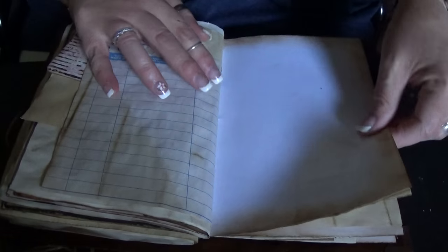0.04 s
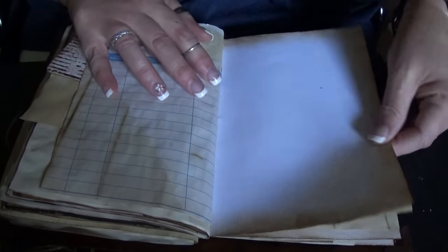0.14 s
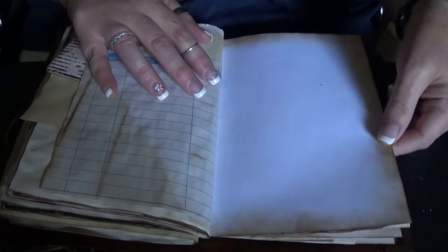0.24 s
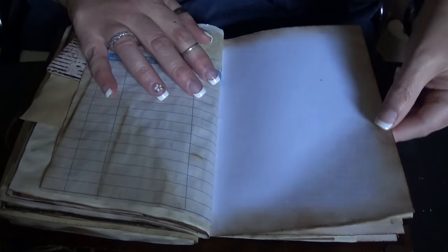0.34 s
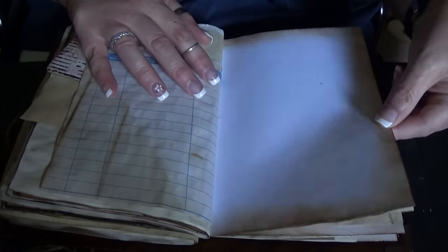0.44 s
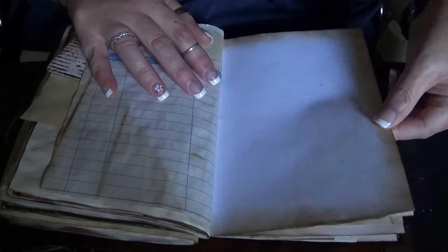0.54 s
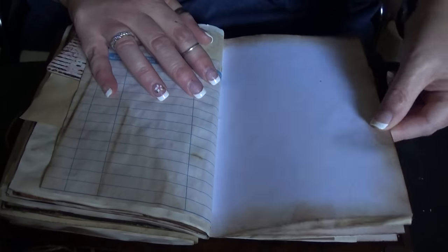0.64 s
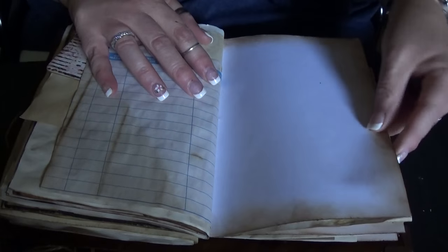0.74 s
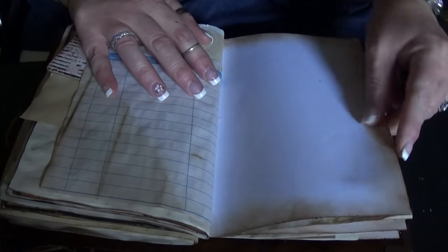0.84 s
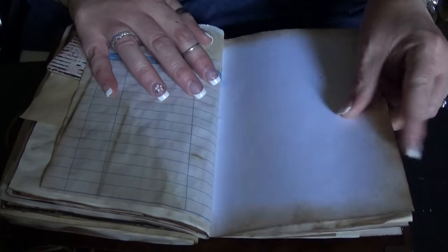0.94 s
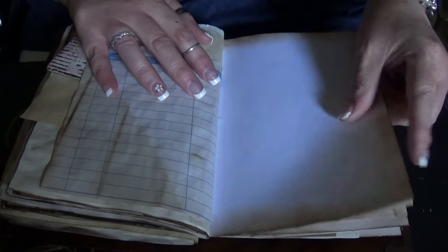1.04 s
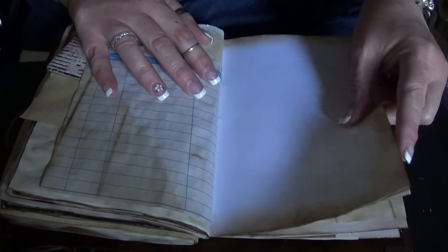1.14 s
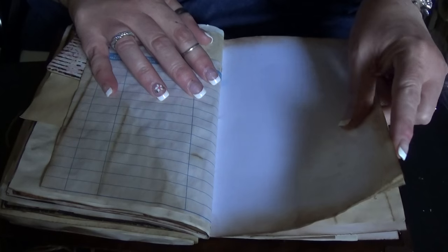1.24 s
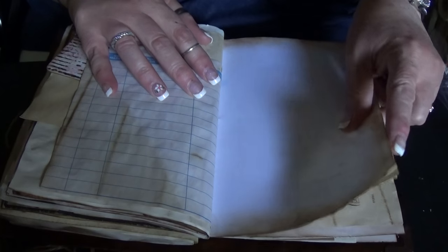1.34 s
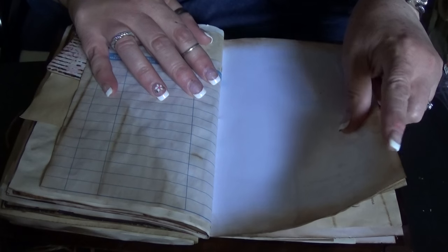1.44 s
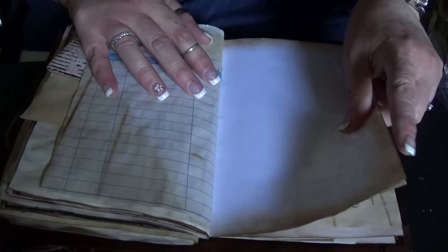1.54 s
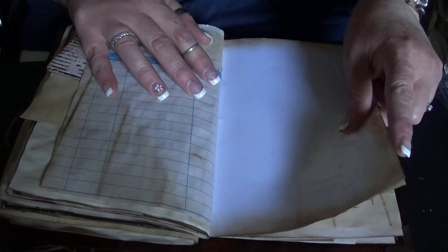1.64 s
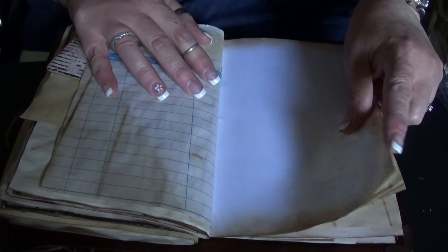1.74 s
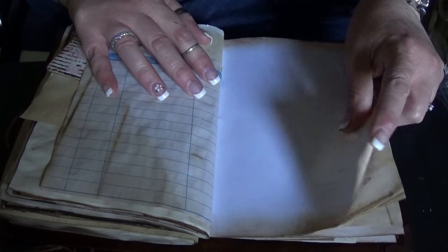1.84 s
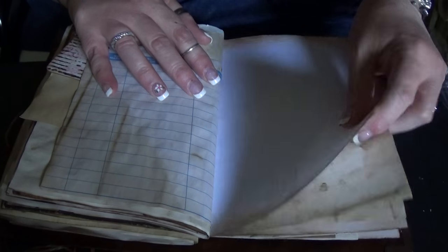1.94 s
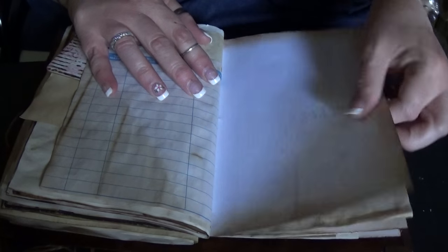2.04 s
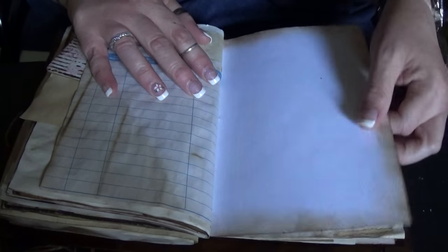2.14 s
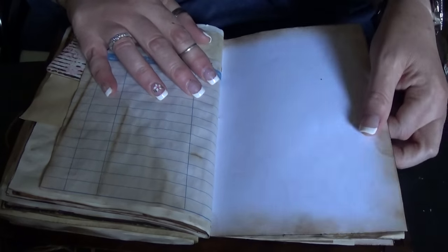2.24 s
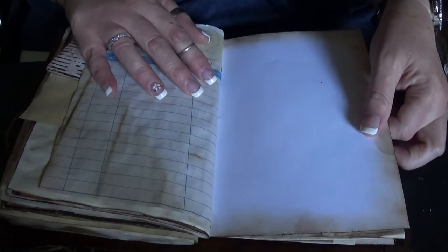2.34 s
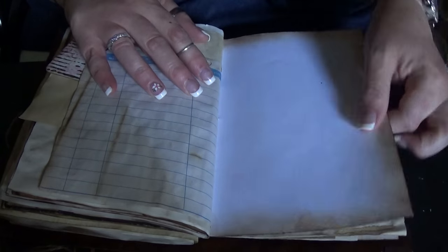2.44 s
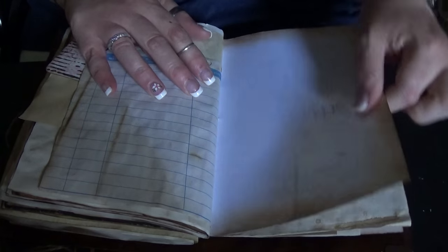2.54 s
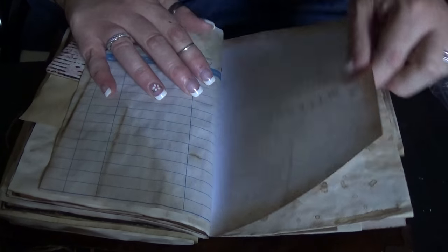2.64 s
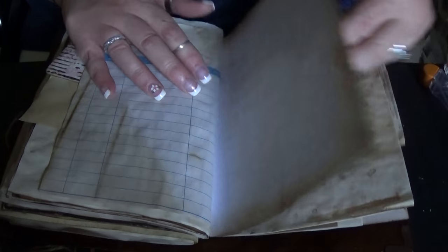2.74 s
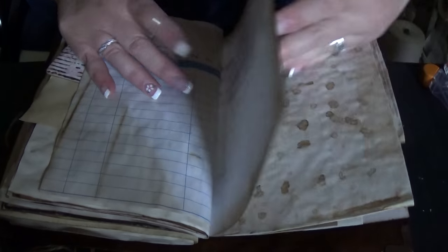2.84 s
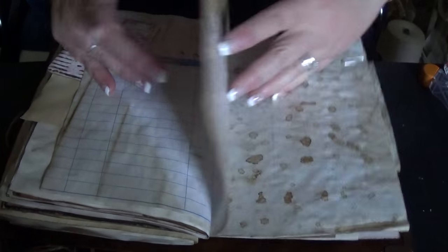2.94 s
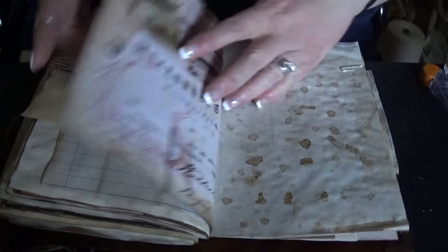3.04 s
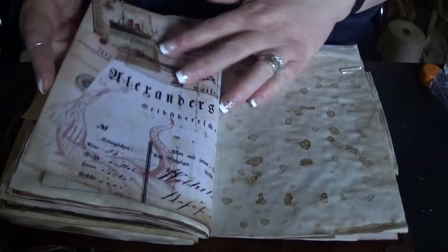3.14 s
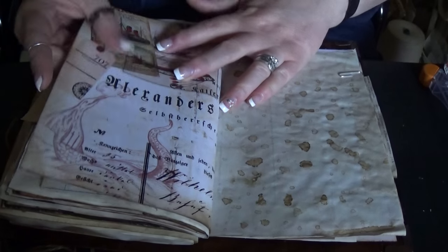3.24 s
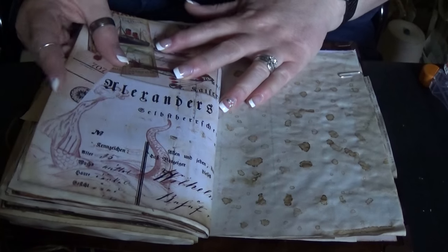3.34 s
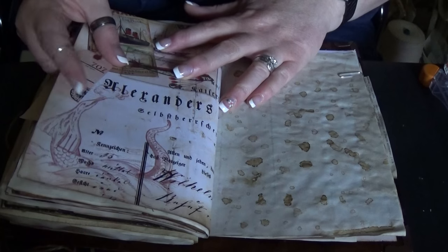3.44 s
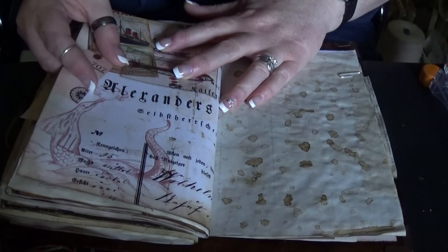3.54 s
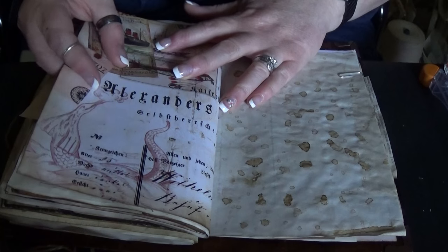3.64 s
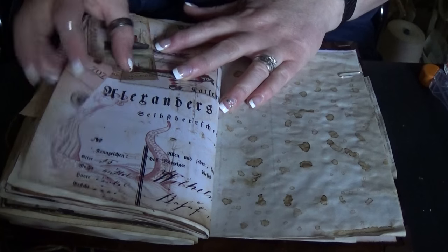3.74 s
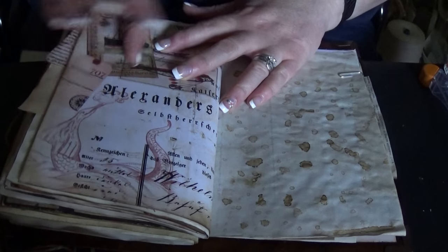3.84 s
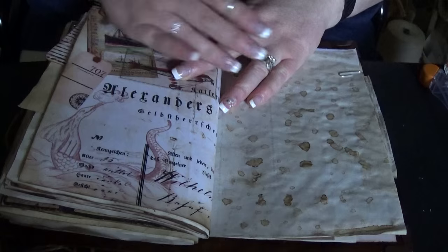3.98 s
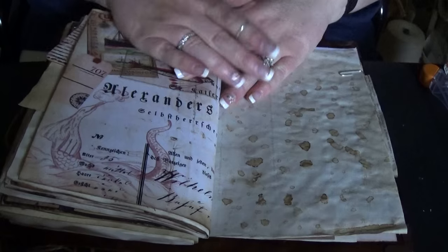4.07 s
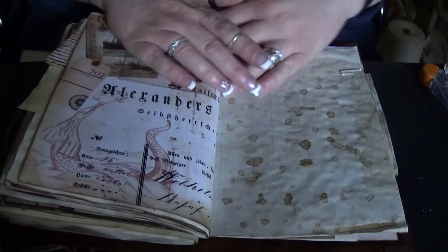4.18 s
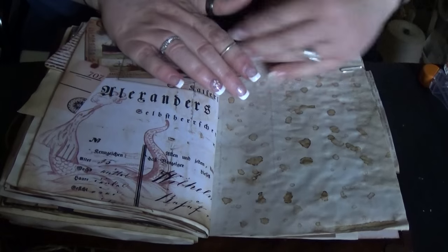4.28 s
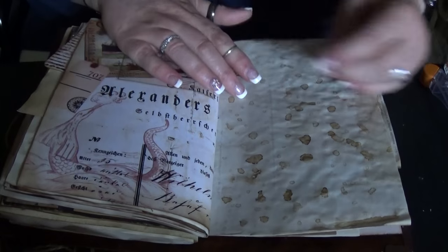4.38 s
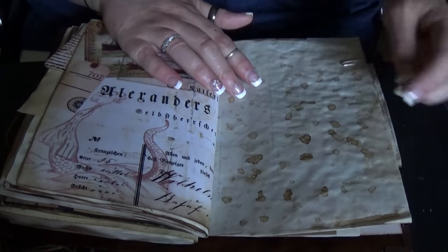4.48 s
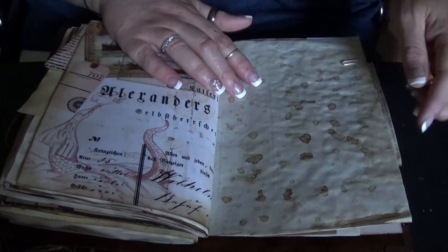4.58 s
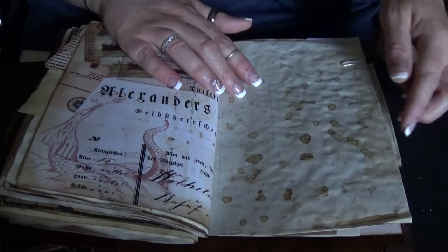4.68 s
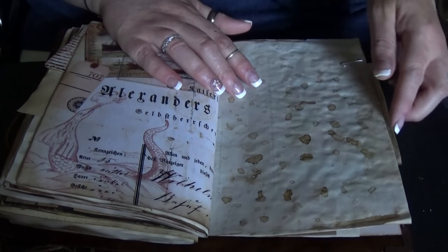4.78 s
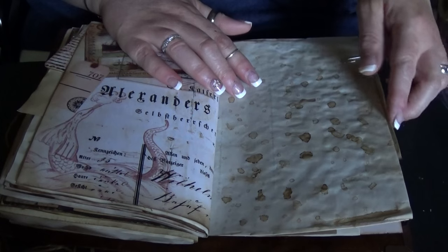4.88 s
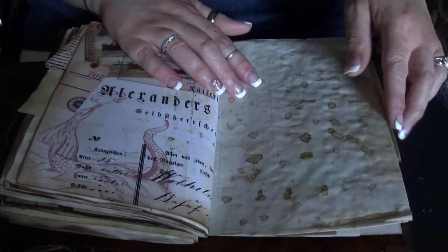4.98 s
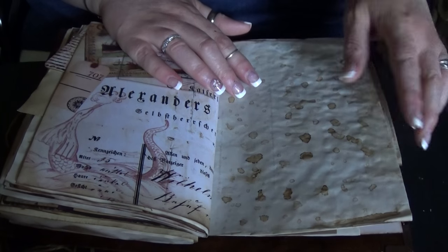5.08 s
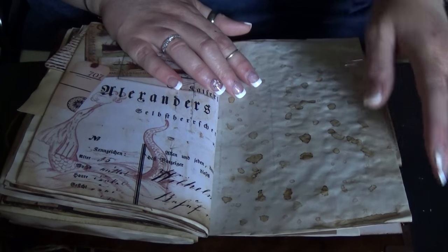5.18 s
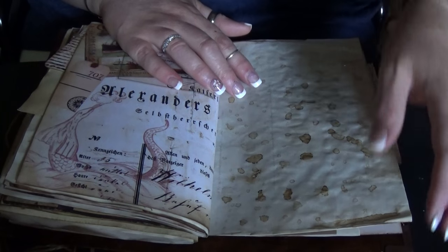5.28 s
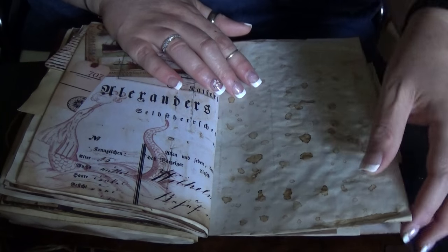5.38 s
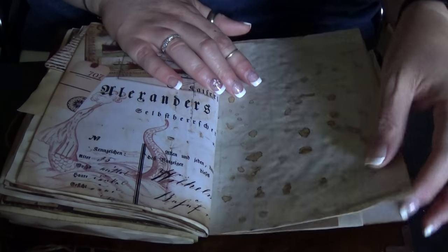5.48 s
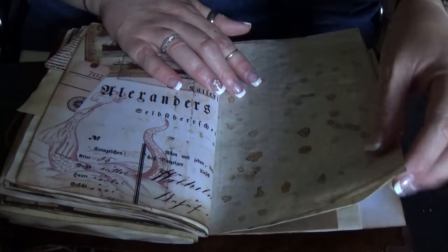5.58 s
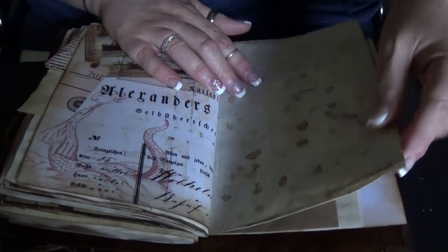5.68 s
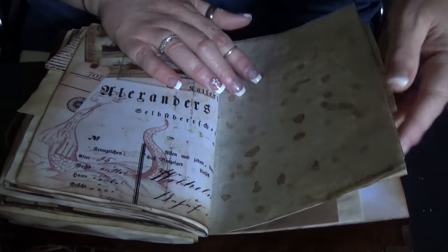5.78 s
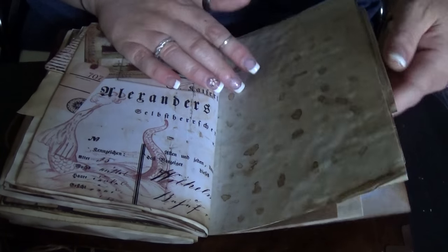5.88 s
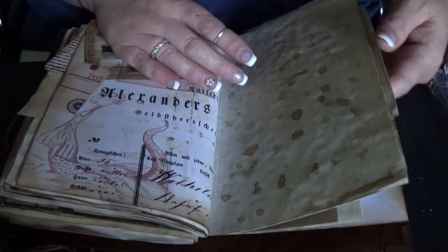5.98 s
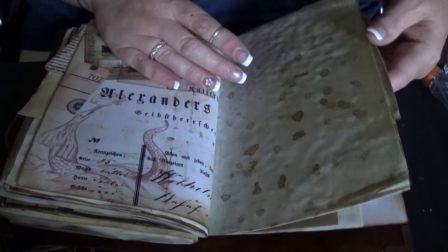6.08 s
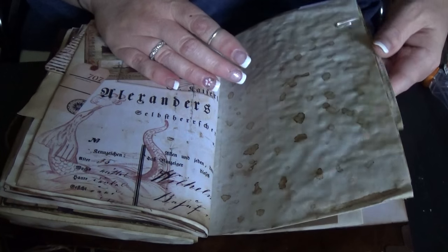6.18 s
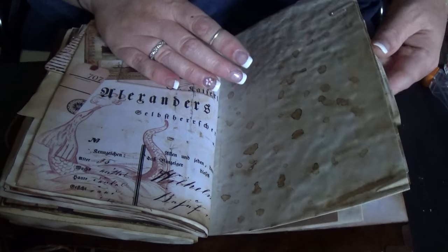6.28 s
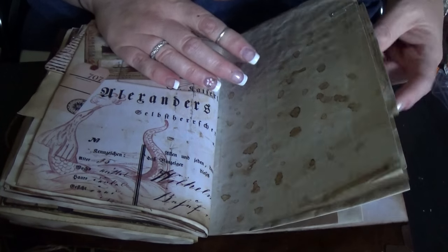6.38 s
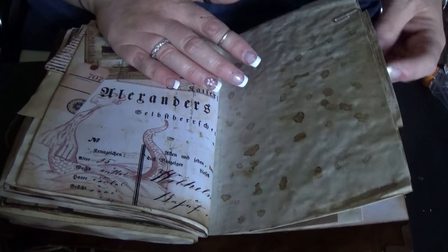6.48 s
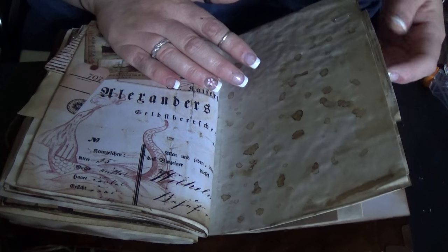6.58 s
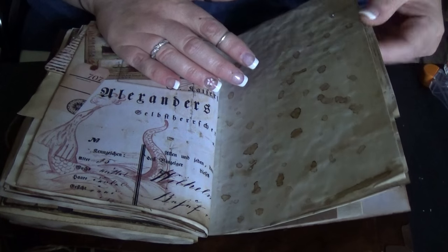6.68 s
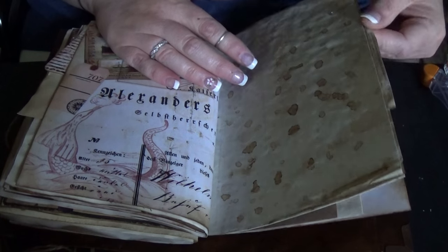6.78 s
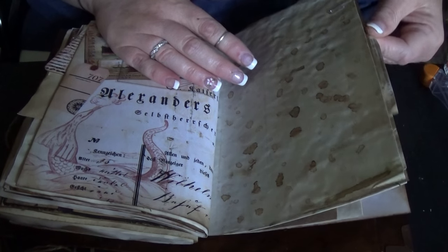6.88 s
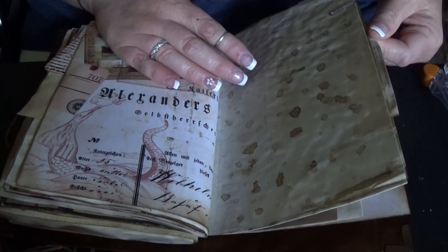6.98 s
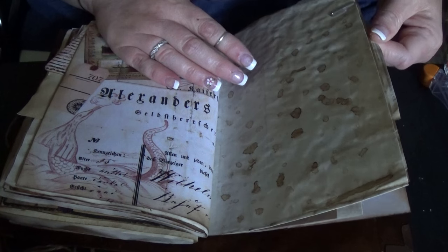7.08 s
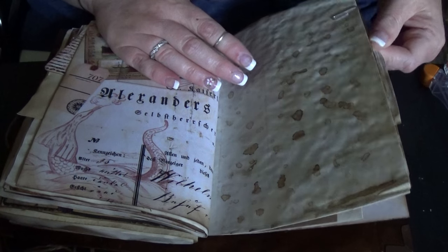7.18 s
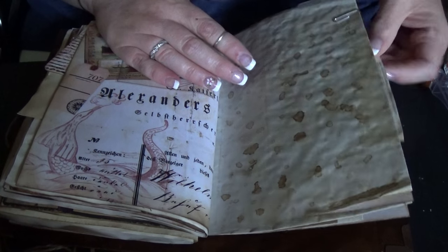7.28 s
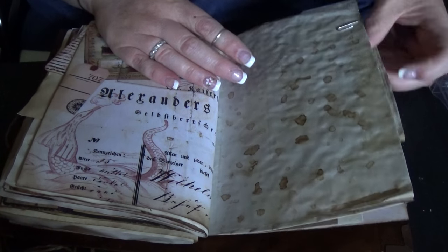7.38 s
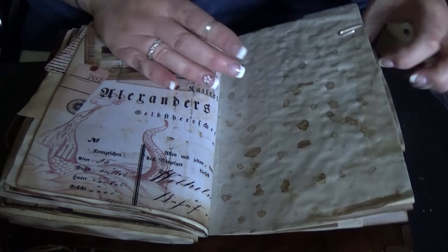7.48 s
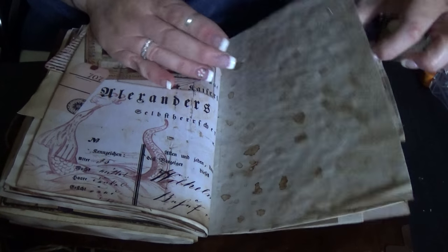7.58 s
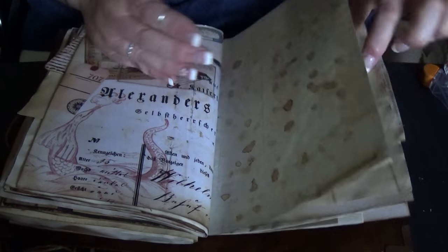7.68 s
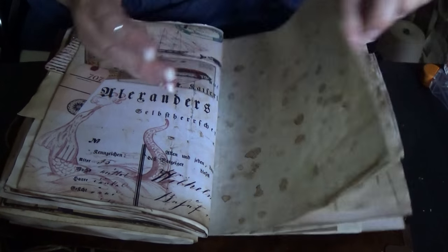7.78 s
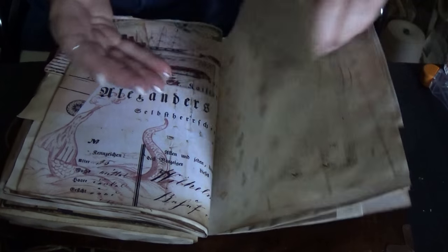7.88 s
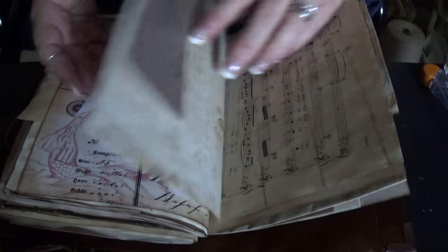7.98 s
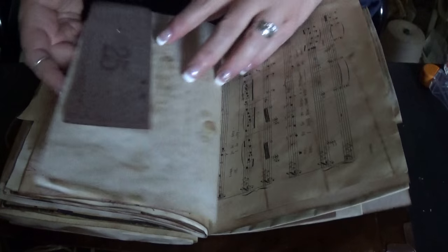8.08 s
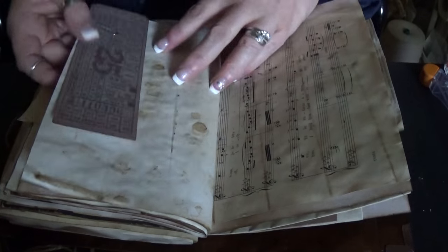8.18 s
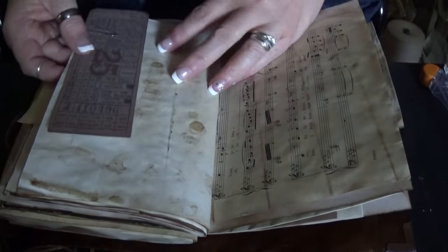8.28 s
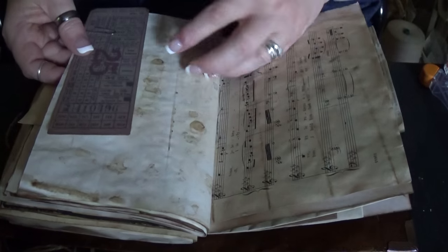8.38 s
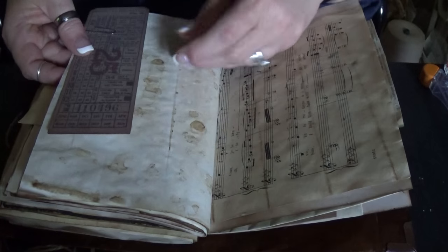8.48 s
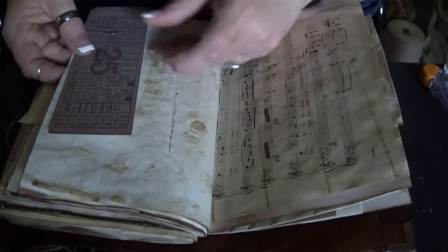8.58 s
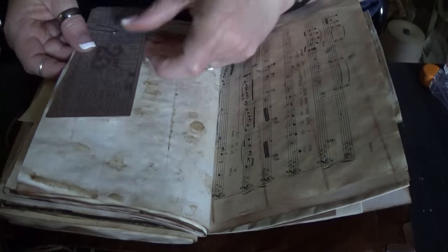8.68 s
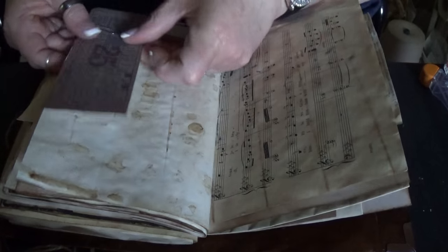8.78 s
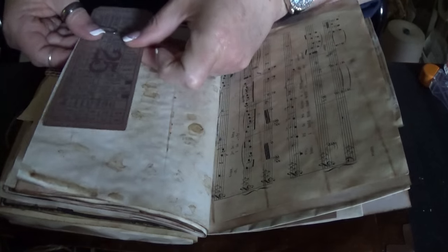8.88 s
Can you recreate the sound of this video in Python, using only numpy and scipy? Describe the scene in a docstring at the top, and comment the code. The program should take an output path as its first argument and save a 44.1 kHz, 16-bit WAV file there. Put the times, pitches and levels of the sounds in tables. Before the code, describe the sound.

Stiff paper pages of a thick journal are handled and turned, with close rustling, sliding and small crisp snaps.

```python
"""Stiff, stained pages of a thick handmade journal, leafed through by two hands, close, in a small room.
Fingers and sheets slide with stick-slip friction; sheets buckle with small snaps and creases tick.
Two pages flop over; hands and falling pages press puffs of air out of the stack.
Underneath: room noise, a faint far drone and, in the first half, the ticking whine of a lens motor."""
import sys
import numpy as np
from scipy import signal
from scipy.fft import rfft, irfft, next_fast_len
from scipy.io import wavfile
from scipy.ndimage import uniform_filter1d

SR = 44100
rng = np.random.default_rng(int(sys.argv[2]) if len(sys.argv) > 2 else 0)


def store_pcm(level_fs):
    """Save levels as 16-bit WAV."""
    pcm = np.round(np.clip(level_fs, -1, 1) * 32767).astype(np.int16)
    wavfile.write(sys.argv[1], SR, np.atleast_2d(pcm).T)


N = 393372
TIME_S = np.arange(N) / SR
BURST_LEAD_S = 0.005
CONTROL_HOP = 64

# room noise: freq_hz, density_db
ROOM_NOISE_SPECTRUM = [(15, -30), (25, -11.5), (70, -7), (161, -6), (211, -5.5), (248, -4), (299, -9.5),
                       (333, -10), (486, -8.5), (557, -13.5), (857, -9), (1120, -13.5), (2090, -20),
                       (2390, -21.5), (15800, -34.5)]
# room noise, left against right: freq_hz, correlation
ROOM_NOISE_COHERENCE = [(60, 1), (130, 0.99), (300, 0.89), (1000, 0.52), (4000, 0.25), (12000, 0.99)]
# far tones: pitch_hz, peak_s, half_width_s, peak_db, rest_db
DRONE_TONES = [(95.2, 2.72, 1.1, -57.5, -71), (213.4, 1.34, 0.67, -60, -79.5)]
# room decay: freq_hz, t60_s
ROOM_DECAY = [(150, 0.29), (1000, 0.28), (4000, 0.4), (9000, 0.23), (16000, 0.12)]
# hands crossing the book, left minus right before port weighting: time_s, pan_db
HAND_PAN = [(0, -1.5), (2.65, -2), (3.2, 1.5), (3.75, 1.5), (5, -3), (7.3, -1.5), (8.15, 0.4), (8.9, 0.5)]
# two microphone ports: freq_hz, pan_weight, left_lead_rad
MIC_PORTS = [(100, .3, .02), (400, 0.65, 0.23), (1000, 1.1, 0.22), (2200, 0.33, 0.26), (3600, 0.91, .09),
             (5840, 1.6, 0.24), (8040, 1.4, 0.087), (10100, 0.36, 0), (13000, 0.15, 0.024)]
# air pressed from the stack: start_s, level_db, decay_s
PUFFS = [(0.23, -45.5, 0.042), (.675, -45.5, 0.031), (3.142, -44, 0.042), (3.719, -41.5, 0.012),
         (3.791, -44.5, 0.026), (4.172, -62, 0.019), (8.143, -73, 0.023), (8.661, -55, 0.11),
         (8.761, -59, 0.099)]
# puff: freq_hz, density_db
PUFF_SPECTRUM = [(40, -18), (110, 5), (180, 1.5), (300, -1), (480, 4.5), (620, 7.5), (1200, -31),
                 (3000, -50)]
# paper's scrape, fine hiss and dull flexing: freq_hz, density_db
SCRAPE_SPECTRUM = [(900, -15), (1800, -1), (2400, -0.5), (3000, 2.5), (4000, 0.5), (5200, -0.5), (6500, -1),
                   (7600, -1.5), (10000, -18)]
HISS_SPECTRUM = [(4000, -20), (6300, -10), (7300, -8.5), (8200, -3), (9200, 2), (10300, -0.5),
                 (11500, -6.5), (13000, -13), (15800, -21)]
FLEX_SPECTRUM = [(60, -25), (140, -9.5), (330, -14), (550, -4), (800, 2.5), (1300, -0.5), (1900, -2.5),
                 (2500, -1.5), (4000, -21.5)]
# highest hiss, finest when skin slides on skin: time_s, gain_db
SHEEN_CURVE = [(0, -0.5), (1.3, 0.5), (1.95, 2), (2.9, 4.5), (3.7, -4), (4.2, 4), (5.1, 3.5), (5.7, 0),
               (6.4, -4), (7.3, -1), (7.95, 3), (8.8, -1.5)]
# buckles, flicked edges, nail taps: start_s, crack_db, tick_rel_db, knock_rel_db, decay_s, pitch_hz
PAPER_SNAPS = [(.2242, -51.5, -11, 9.5, .0022, 700), (.2656, -60.5, -4, 15, .0011, 930),
               (.2961, -52, -1, 7.5, .003, 730), (0.432, -52.5, -1, -6, 0.0015, 980),
               (0.6771, -43.5, -2, 10, 0.0018, 1270), (.683, -39, -1, -9, 0.0054, 1140),
               (0.916, -40.5, -11, 1.5, 0.002, 2330), (0.9589, -36.5, -19, -0.5, 0.0071, 1190),
               (1.0987, -47.5, -17, -15, .0008, 5090), (1.127, -48.5, -19, 5.5, .0007, 820),
               (1.2898, -28.5, -1, -11, 0.0011, 3820), (1.9183, -40.5, 13, -1.5, 0.0068, 5500),
               (1.9716, -34.5, -3, -2, .0018, 5510), (2.0085, -35, 8, -16, 0.0015, 5890),
               (2.7777, -46.5, 2, -10, 0.002, 3200), (3.099, -42, -3, -15, .0015, 5590),
               (3.1357, -34.5, 1, 1.5, 0.0031, 4040), (3.1448, -41.5, -5, 6.5, 0.0086, 1210),
               (3.1493, -31.5, -4, -1.5, 0.0013, 2960), (3.7215, -46, 9, 8, 0.0026, 1250),
               (3.7833, -36.5, -7, -20, .0025, 4030), (3.8005, -43.5, 7, -10, .0011, 5300),
               (4.1734, -59, 5, 10, 0.0016, 1480), (4.796, -54, -19, -2, 0.0012, 3380),
               (4.84, -55, -12, -8, 0.001, 3000), (4.3882, -44, 5, -22, .0045, 4740),
               (4.88, -55, 6, -16, .00085, 3610), (4.9507, -51.5, -7, -9, .001, 1760),
               (5.067, -40.5, -2, -23, .0009, 2980), (5.4258, -54, 2, -4, 0.0032, 4010),
               (5.474, -63, 11, -8, .0006, 5000), (5.524, -55.5, -4, 10.5, 0.0011, 790),
               (5.5492, -37.5, -14, -5.5, 0.0018, 5300), (5.6175, -47, -2, -9, 0.00099, 3370),
               (5.735, -47, -17, 2, 0.0018, 2320), (5.8648, -62, 0, 12, .0018, 900),
               (6.1989, -41.5, -11, -6, 0.0027, 1050), (6.2281, -46, 4, 6.5, 0.0021, 756),
               (6.2632, -41.5, 8.5, -1, 0.0036, 4120), (6.3489, -29, -7, -26, 0.0014, 4230),
               (6.3632, -41, 12, -25, 0.0016, 4460), (6.3966, -27.5, 5.5, -5, 0.0017, 5000),
               (6.714, -42, -3, -6, 0.0037, 4580), (6.834, -52, 8, -5, 0.0093, 3980),
               (7.31, -39.5, -5, -14, 0.0034, 2370), (7.5714, -43.5, 3, -13, 0.00089, 2880),
               (7.6037, -42, 1, 1.5, 0.00075, 975), (7.7196, -41.5, -5, -12, 0.0063, 2740),
               (7.8014, -35.5, -17, -3, 0.0038, 3870), (7.8255, -38, -17, 7, 0.0073, 895),
               (7.8804, -30.5, -11, -4, 0.0026, 2720), (7.9031, -22, -8, -24, 0.0017, 3280),
               (7.9283, -35.5, 2, -0.5, 0.0017, 2230), (8.001, -38, -6, -6, .0022, 3700),
               (8.0105, -40, 6.5, -16, 0.00082, 4100), (8.0958, -31.5, -6, -7, 0.0035, 2380),
               (8.1076, -22.5, 0, -23, 0.00058, 2870), (8.3402, -46, -7, 2, 0.0019, 1700),
               (8.6148, -44.5, -8, 2, 0.0014, 1500), (8.6583, -35.5, -20, -0.5, 0.0014, 3080),
               (8.7112, -28, -8, -9.5, 0.0019, 3320), (8.907, -43, -16, -5, .0009, 3600)]
# finger or sheet slides: peak_s, rise_s, fall_s, scrape_db, hiss_rel_db, flex_rel_db, span_pitch_hz
SLIDE_STROKES = [ (.04, 0.19, 0.054, -41, -2, -7.5, 4200), (.16, 0.088, 0.1, -39, -1, -10, 4360),
                 (.25, 0.066, .05, -52, -3, 5.5, 3900), (.315, 0.085, 0.075, -47.5, -0.5, -21, 3770),
                 (.5, 0.34, 0.18, -61, -4.5, -2, 3300), (.685, 0.068, 0.026, -49.5, -2, 7.5, 3600),
                 (.75, 0.1, 0.065, -44.5, 4.5, -10, 5040), (.885, 0.039, 0.051, -40, 2.5, -10, 5440),
                 (.935, .05, 0.11, -43, 0.5, -11, 5200), (1.085, 0.031, 0.034, -52.5, -3, 5.5, 4600),
                 (1.235, 0.066, 0.089, -53.5, -4.5, -5, 4500), (1.31, 0.057, 0.11, -50, -3.5, -5.5, 4300),
                 (1.41, 0.031, 0.027, -39, 0, -12, 4230), (1.49, 0.058, 0.065, -54, -2, -6, 4100),
                 (1.555, 0.025, 0.016, -56.5, 7, -13, 4100), (1.86, .04, 0.09, -44.5, -8, -24, 4400),
                 (1.93, 0.09, 0.041, -40.5, -0.5, -12, 5030), (2.016, 0.16, 0.12, -37.5, 5.5, -12.5, 5100),
                 (2.209, .04, 0.057, -56.5, -4, 1.5, 5000), (2.43, 0.15, 0.091, -57.5, -2, -7, 3800),
                 (2.675, 0.14, 0.08, -42, -8.5, -14, 3950), (2.73, 0.12, 0.078, -53, 5, -6, 3800),
                 (2.819, 0.035, 0.013, -39.5, 0.5, -14, 3800), (2.89, 0.047, 0.31, -52.5, 13, -12, 4080),
                 (3.14, 0.19, .15, -43, 5.5, -11, 3480), (3.3, .1, 0.13, -52, 5, -9, 3450),
                 (3.54, 0.079, 0.097, -58.5, 7, -17, 3700), (3.76, .13, 0.057, -40.5, 5.5, -17, 4060),
                 (3.8, 0.037, 0.027, -48.5, -9, 4.5, 4000), (4.045, .018, 0.11, -62, 12.5, -8, 4000),
                 (4.23, 0.18, 0.21, -47.5, 10.5, -6, 3800), (4.41, 0.11, 0.034, -53.5, 12.5, -17, 4070),
                 (4.86, 0.11, 0.047, -56, -8, -3, 3600), (5.062, 0.021, 0.021, -40, -2, -23, 4150),
                 (5.55, 0.058, 0.054, -52, 4.5, -7, 4600), (5.7, 0.11, 0.11, -51.5, 5.5, -8.5, 4940),
                 (5.93, 0.17, 0.14, -53.5, 8, -4, 4420), (6.075, 0.11, 0.1, -46.5, 4, -28, 4600),
                 (6.29, 0.16, 0.16, -46, 3.5, -7, 3600), (6.378, 0.045, 0.044, -30, -3, -10, 3120),
                 (6.42, .03, 0.11, -52.5, 2.5, 0, 3000), (6.595, 0.066, 0.034, -55.5, 1, -21, 3730),
                 (6.73, 0.065, 0.12, -49.5, 3.5, -9, 3960), (7.295, 0.063, .06, -50.5, 3, -1, 3500),
                 (7.395, 0.085, 0.088, -43, 2.5, -11, 3900), (7.53, 0.072, 0.086, -53, -0.5, -7, 3600),
                 (7.68, 0.12, 0.05, -54, -0.5, -4, 3160), (7.772, 0.047, 0.051, -41.5, -3, -6, 3080),
                 (7.88, 0.096, 0.15, -46.5, 3.5, -0.5, 3450), (8.015, 0.12, 0.065, -43.5, 5.5, -8, 3530),
                 (8.124, 0.064, 0.1, -41.5, 3.5, -2.5, 3600), (8.24, 0.2, 0.26, -50.5, 9.5, -8.5, 3630),
                 (8.407, 0.043, 0.035, -41.5, 2, -6.5, 3870), (8.495, 0.12, 0.098, -49, 1.5, -4, 3650),
                 (8.67, 0.22, 0.24, -49, 9.5, -3.5, 3150), (8.799, 0.093, .14, -49, 15.5, -5, 4240)]
# resting hands, never quite still: scrape_db, hiss_rel_db, flex_rel_db, span_pitch_hz
RESTING_HANDS = (-69.5, -1, 1.5, 3709)


def amp(db):
    return 10 ** (np.asarray(db) / 20)


def unit_rms(x):
    return x / np.sqrt(np.mean(x ** 2) + 1e-20)


def log_interp(points, hz):
    knots_hz, values = np.transpose(points)
    return np.interp(np.log(hz + 1), np.log(knots_hz + 1), values)


def bell(hz, centre_hz, width_oct):
    return np.exp(-(np.log2((hz + 1) / centre_hz) / width_oct) ** 2)


def colour(x, spectrum, ring_hz=1000, ring_db=0):
    """Spectral shaping with an optional broad resonance or dip; rms 1."""
    size = next_fast_len(len(x))
    hz = np.fft.rfftfreq(size, 1 / SR)
    gain = amp(log_interp(spectrum, hz) + ring_db * bell(hz, ring_hz, width_oct=0.38))
    return unit_rms(irfft(rfft(x, size) * gain, size)[:len(x)])


def wander(rate_hz):
    """Random drift, rms 1."""
    knots = rng.standard_normal(8192)
    return unit_rms(np.interp(TIME_S * rate_hz, np.arange(len(knots)), knots))


def add(mix, start_s, sound):
    part = mix[max(round(start_s * SR), 0):][:len(sound)]
    part += sound[:len(part)]


def room_noise(level_db):
    """Steady noise, its bass nearly alike on both sides."""
    hz = np.fft.rfftfreq(N, 1 / SR)
    left, independent = rfft(rng.standard_normal((2, N)))
    correlation = np.clip(log_interp(ROOM_NOISE_COHERENCE, hz), -1, 1)
    right = correlation * left + np.sqrt(1 - correlation ** 2) * independent
    spectra = np.array([left, right]) * amp(log_interp(ROOM_NOISE_SPECTRUM, hz))
    return amp(level_db) * unit_rms(irfft(spectra, N))


def far_drone(waver_hz):
    """Two low wavering tones, each swelling once, like traffic through a wall."""
    out = np.zeros(N)
    for pitch_hz, peak_s, half_width_s, peak_db, rest_db in DRONE_TONES:
        level_db = rest_db + (peak_db - rest_db) * np.exp(-((TIME_S - peak_s) / half_width_s) ** 2)
        phase_rad = 2 * np.pi * np.cumsum(pitch_hz + waver_hz * wander(rate_hz=9)) / SR
        out += amp(level_db) * np.sqrt(2) * np.sin(phase_rad)
    return out


def lens_motor(pitch_hz, step_hz, max_db, half_width_s, spread_db):
    """Each motor step is a tiny pip of uneven strength."""
    steps_s = np.arange(0.4394, 4.5, 1 / step_hz)
    strengths = amp(-spread_db * rng.exponential(1, len(steps_s)))
    t = np.arange(-SR // 80, SR // 80) / SR
    pip = np.exp(-(t / half_width_s) ** 2) * np.sin(2 * np.pi * pitch_hz * t)
    out = np.zeros(N)
    for step_s, strength in zip(steps_s, strengths):
        add(out, step_s + t[0], strength * pip)
    return amp(max_db) * out


def room_tail(x, level_db):
    """Short reflections of a small furnished room; the top treble dies first."""
    size = SR * 3 // 5
    taps = rng.choice([-1., 1.], (2, size)) * (rng.random((2, size)) < 3000 / SR)
    taps *= np.arange(size) > SR // 200  # 5 ms pre-delay
    hz, t, bins = signal.stft(taps, SR, nperseg=256)
    walls_db = log_interp([(300, 22.5), (1200, 18.5), (4000, 5.5), (9000, 11.5), (15000, -32)], hz)
    decay_db = 60 * t / log_interp(ROOM_DECAY, hz)[:, None]
    tail = signal.istft(bins * amp(walls_db[:, None] - decay_db), SR, nperseg=256)[1][:, :size]
    return amp(level_db) * signal.fftconvolve(x[None], unit_rms(tail) / np.sqrt(size), axes=1)[:, :N]


def mic_ports(x):
    """Two close ports place the hands by level and phase difference."""
    hz, t, bins = signal.stft(x, SR, nperseg=256)
    port_hz, pan_weight, lead_rad = np.transpose(MIC_PORTS)
    pan_db = np.interp(hz, port_hz, pan_weight)[:, None] * np.interp(t, *np.transpose(HAND_PAN))
    left_gain = amp(pan_db / 2) * np.exp(0.5j * np.interp(hz, port_hz, lead_rad))[:, None]
    return signal.istft(np.array([bins * left_gain, bins / left_gain]), nperseg=256)[1][:, :N]


def air_puffs(rise_s):
    """A hand or falling page presses a soft, low puff out of the stack."""
    t = np.arange(SR // 4) / SR
    out = np.zeros(N)
    for start_s, level_db, decay_s in PUFFS:
        envelope = (1 - np.exp(-t / rise_s)) * np.exp(-t / decay_s)
        add(out, start_s, amp(level_db) * envelope * colour(rng.standard_normal(len(t)), PUFF_SPECTRUM))
    return out


def sheet_burst(spectrum, ring_hz, ring_db, decay_s, lag_s=0):
    """A kick and a shiver dying in the damped sheet; energy of 6.6 ms at rms 1."""
    t = np.arange(2048) / SR - BURST_LEAD_S
    age_s = np.maximum(t - lag_s, 0)
    shiver = (1 - np.exp(-age_s / 0.00052)) * np.exp(-age_s / decay_s) * rng.standard_normal(len(t))
    jolt = shiver / np.linalg.norm(shiver)
    jolt[np.searchsorted(age_s, 0.0005)] += 0.46 * min(0.001 / decay_s, 1)  # kick
    return colour(jolt, spectrum, ring_hz, ring_db) * np.sqrt(0.0066 * SR / len(t))


def crinkles(scrape_db, max_per_s, base_db, spread_db, db_per_scrape_db, pitch_count=12):
    """Tiny creases give way at random, denser and louder under a firmer stroke."""
    chance = max_per_s / pitch_count / SR * np.clip((scrape_db + 67) / 10, 0, 1)
    floor_db = base_db + db_per_scrape_db * (scrape_db + 52)
    out = np.zeros(N)
    for ring_hz in np.geomspace(1200, 10000, pitch_count):
        hits = rng.random(N) < chance
        sizes = amp(floor_db + spread_db * np.minimum(rng.exponential(1, N), 3))
        crack = sheet_burst(SCRAPE_SPECTRUM, ring_hz, ring_db=-7, decay_s=0.0006)
        tick = sheet_burst(HISS_SPECTRUM, ring_hz, ring_db=-4, decay_s=0.0011)
        knock = amp(-5) * sheet_burst(FLEX_SPECTRUM, ring_hz, ring_db=8, decay_s=0.0028)
        out += signal.oaconvolve(hits * sizes, crack + tick + knock)[:N]
    return out


def snaps():
    """Bending waves carry the treble first; the dull knock comes later and rings longer."""
    out = np.zeros(N)
    for start_s, crack_db, tick_rel_db, knock_rel_db, decay_s, pitch_hz in PAPER_SNAPS:
        crack = sheet_burst(SCRAPE_SPECTRUM, pitch_hz, ring_db=7.5, decay_s=decay_s)
        # a whole patch flips too slowly for the highest hiss
        tick = sheet_burst(HISS_SPECTRUM, ring_hz=15100, ring_db=-10, decay_s=decay_s)
        knock = sheet_burst(FLEX_SPECTRUM, pitch_hz, ring_db=6.5, decay_s=decay_s + 0.0016, lag_s=0.00028)
        snap = crack + amp(tick_rel_db) * tick + amp(knock_rel_db) * knock
        add(out, start_s - BURST_LEAD_S, amp(crack_db) * snap)
    return out


def stroke_power(peak_s, rise_s, fall_s, edge_db=-19):
    """A stroke speeds up, then slows: share of full power, edge_db at rise_s before and fall_s after."""
    t = TIME_S[::CONTROL_HOP] - peak_s
    swell = np.clip(-t / rise_s, 0, 4) ** 1.76
    stop = np.clip(t / fall_s, 0, 4) ** 2.02
    return amp(edge_db * (swell + stop)) ** 2


def hand_motion():
    """Strokes and resting hands add in power; the strongest dominates the free span's pitch."""
    shares = np.array([stroke_power(*row[:3]) for row in SLIDE_STROKES])
    shares = np.vstack([shares, np.ones(shares.shape[1])])
    settings = [row[3:] for row in SLIDE_STROKES] + [RESTING_HANDS]
    scrape_db, hiss_rel_db, flex_rel_db, span_hz = np.transpose(settings)
    levels_db = [10 * np.log10(amp(scrape_db + rel_db) ** 2 @ shares)
                 for rel_db in (0, hiss_rel_db, flex_rel_db)]
    power = amp(scrape_db) ** 2
    pitch_hz = (span_hz * power) @ shares / (power @ shares)
    return [np.interp(TIME_S, TIME_S[::CONTROL_HOP], curve) for curve in levels_db + [pitch_hz]]


def friction(spectrum, slips_per_s, spread_db, rush_gain):
    """Fibres catch and let go: a rain of tiny slips over a smooth rush."""
    slips = (rng.random(N) < slips_per_s / SR) * rng.choice([-1, 1], N)
    sizes = amp(spread_db * np.minimum(rng.exponential(1, N), 4))
    return colour(unit_rms(slips * sizes) + rush_gain * rng.standard_normal(N), spectrum)


def sheet_bending(x, ring_hz, patch_db, ring_db):
    """As a sheet bends, its main resonance moves and lesser ones come and go; the top hiss varies."""
    hz, t, bins = signal.stft(x, SR, nperseg=512)
    patches = uniform_filter1d(rng.standard_normal(bins.shape), size=7, axis=0)
    patches = unit_rms(uniform_filter1d(patches, size=9, axis=1))
    resonance = bell(hz[:, None], np.interp(t, TIME_S, ring_hz), width_oct=0.69)
    sheen_db = bell(hz[:, None], 14200, width_oct=0.5) * np.interp(t, *np.transpose(SHEEN_CURVE))
    gain = amp(patch_db * patches + ring_db * resonance + sheen_db)
    return unit_rms(signal.istft(bins * gain, nperseg=512)[1][:N])


def sliding(scrape_db, hiss_db, flex_db, span_hz):
    """Skin and sheets slide; the fluttering grip shakes scrape, hiss and flexing together."""
    flutter_db = 1.22 * wander(rate_hz=140) + 0.88 * wander(rate_hz=40)
    scrape = friction(SCRAPE_SPECTRUM, slips_per_s=2000, spread_db=2, rush_gain=1)
    scrape = sheet_bending(scrape, span_hz, patch_db=2.5, ring_db=7)
    hiss = friction(HISS_SPECTRUM, slips_per_s=7400, spread_db=0, rush_gain=2.1)
    hiss = sheet_bending(hiss, span_hz, patch_db=2, ring_db=4)
    flex = friction(FLEX_SPECTRUM, slips_per_s=500, spread_db=4.5, rush_gain=0.75)
    flex = sheet_bending(flex, 0.52 * span_hz, patch_db=3, ring_db=-0.5)
    return amp(flutter_db) * (amp(scrape_db) * scrape + amp(hiss_db) * hiss + amp(flex_db) * flex)


def scene():
    """Close paper and its room tail over the background."""
    scrape_db, hiss_db, flex_db, span_hz = hand_motion()
    paper = snaps()
    paper += crinkles(scrape_db, max_per_s=34, base_db=-62, spread_db=3, db_per_scrape_db=0.12)
    paper += sliding(scrape_db, hiss_db, flex_db, span_hz)
    paper += air_puffs(rise_s=0.0005)
    background = room_noise(level_db=-56.5) + far_drone(waver_hz=1.175)
    background += lens_motor(pitch_hz=3214, step_hz=29.97, max_db=-53.5, half_width_s=0.004, spread_db=5)
    return mic_ports(paper) + room_tail(paper, level_db=-19.5) + background


def record(dry):
    """Camera band limit."""
    cutoff_hz = 15950
    lowpass = signal.firwin(511, cutoff_hz, window=("kaiser", 9), fs=SR)
    return signal.oaconvolve(dry, lowpass[None], "same")


dry = scene()
out = record(dry)
store_pcm(out)
```